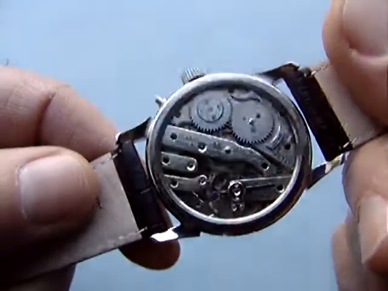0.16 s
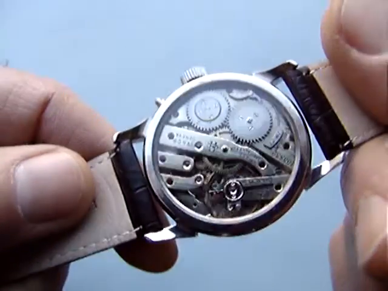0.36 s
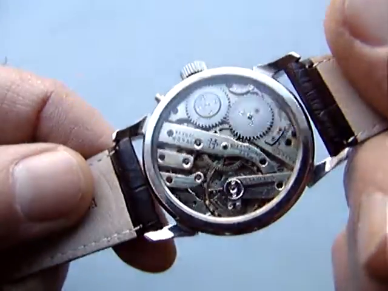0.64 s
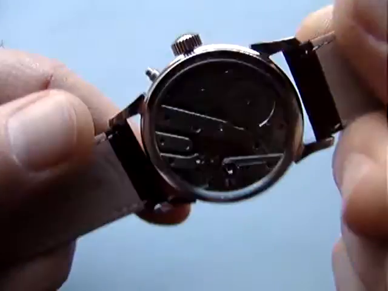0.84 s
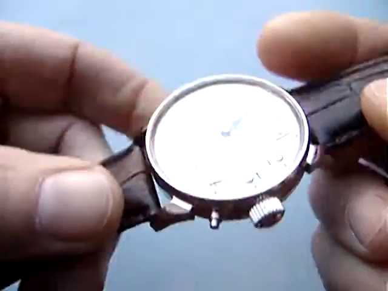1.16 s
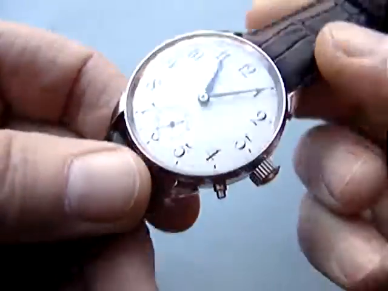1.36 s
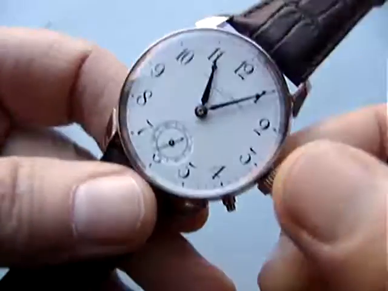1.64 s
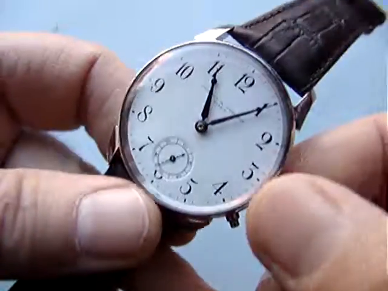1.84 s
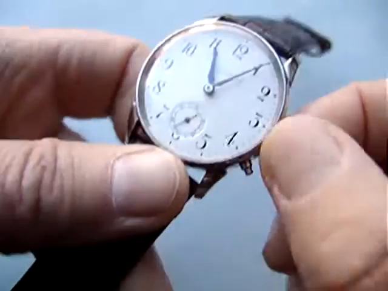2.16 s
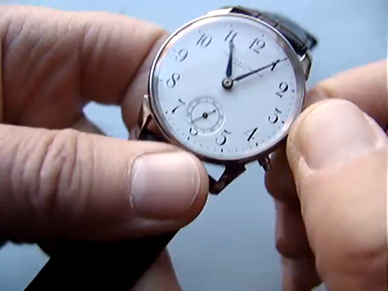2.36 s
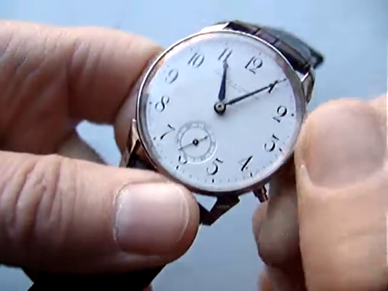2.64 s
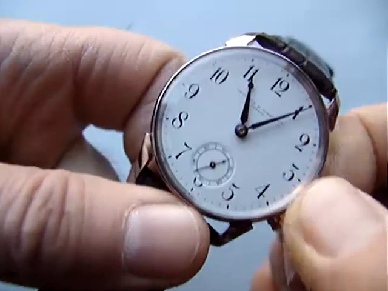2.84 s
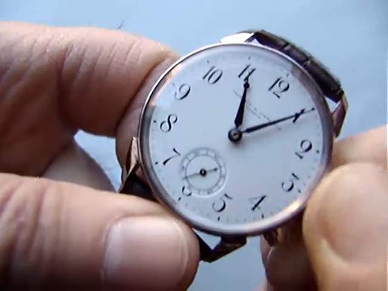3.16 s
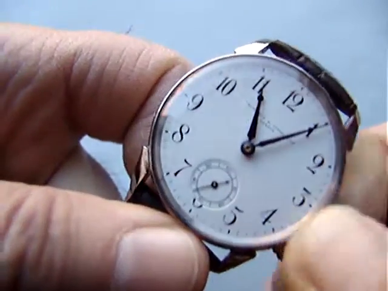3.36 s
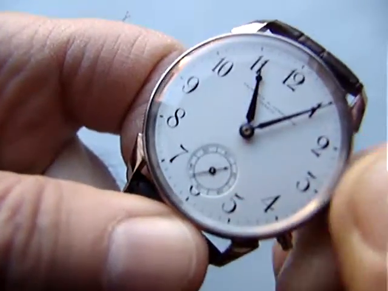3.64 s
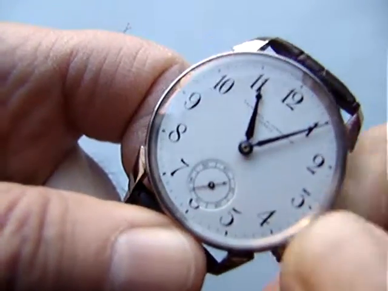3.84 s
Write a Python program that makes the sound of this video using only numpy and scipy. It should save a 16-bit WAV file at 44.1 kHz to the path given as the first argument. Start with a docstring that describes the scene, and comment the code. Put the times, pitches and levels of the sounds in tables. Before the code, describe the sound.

A wristwatch is wound close to the microphone in a quiet room. First, fingers softly rub and tap the case and strap over faint ticking; then short twists of the crown give quick runs of crisp metallic clicks.

```python
"""A quiet room, one microphone close to a mechanical wristwatch held in the hand.
The watch is turned over, then wound in short twists of the crown: the ratchet pawl snaps over the teeth
and rings the movement. Fingertips tap and bump the case, skin rubs on strap and case, and the escapement
ticks faintly. Behind the watch lie the hiss and low rumble of the room."""
import sys
import numpy as np
from scipy import signal
from scipy.fft import rfft, irfft
from scipy.io import wavfile

SR = 44100
rng = np.random.default_rng(int(sys.argv[2]) if len(sys.argv) > 2 else 0)


def put_to_file(sound):
    """Save the sound as 16-bit audio at rate SR, in the file named by the first command-line argument."""
    columns = np.atleast_2d(sound).T  # one column per channel
    safe = np.clip(columns, -1, 1)
    whole_steps = np.round(safe * 32767)
    wavfile.write(sys.argv[1], SR, whole_steps.astype(np.int16))


N = 176400

# pawl snaps: t/s, then level/dB of the upper, case, plate and top rings
PAWL = [(2.3585, -30.5, -56, -38.5, -37), (2.4019, -23, -65, -40, -28), (2.4277, -22.5, -61, -40.5, -25),
        (2.4598, -22.5, -64.5, -47, -25), (2.492, -24.5, -71, -40, -26), (2.5144, -24.5, -65, -40.5, -25),
        (2.5358, -23.5, -81, -40, -27.5), (2.5576, -28, -100, -41, -26), (2.5843, -26.5, -69, -48, -26),
        (2.7307, -68, -63, -34.5, -64), (2.7557, -24, -48, -21.5, -9), (2.779, -30, -44, -31, -15.5),
        (2.8011, -19, -41.5, -22, -14), (2.827, -20.5, -48.5, -24, -24.5), (2.8475, -27, -48, -32.5, -24.5),
        (2.8539, -25, -61, -37, -18), (2.9316, -39, -79, -53, -27.5), (2.9966, -32, -74, -44, -21),
        (3.022, -31, -62, -42, -24), (3.0318, -22.5, -51, -31.5, -17.5), (3.0417, -62, -53, -34, -66),
        (3.0604, -27, -59, -44, -24), (3.0812, -29, -62, -41, -23.5), (3.1102, -32, -63, -44.5, -21),
        (3.2791, -21.5, -54, -30, -12.5), (3.3025, -25.5, -53, -41, -11), (3.3238, -33, -58, -41.5, -14),
        (3.3482, -32, -61, -36, -13), (3.4279, -26.5, -77, -40.5, -27), (3.4645, -17.5, -44.5, -28.5, -19),
        (3.488, -31, -65, -42, -27), (3.5087, -28.5, -59, -46, -28), (3.5301, -26, -58, -50, -25.5),
        (3.5453, -32.5, -52.5, -38, -34), (3.5586, -31.5, -55, -41.5, -23),
        (3.5693, -24.5, -60, -48.5, -31), (3.587, -31, -60, -44, -27.5), (3.6194, -24, -98, -48, -29.5),
        (3.7221, -32.5, -68, -54, -35), (3.7446, -19.5, -59, -43, -31), (3.7595, -18.5, -56, -40.5, -13),
        (3.7744, -24, -56, -39, -18), (3.791, -30, -53.5, -36, -23), (3.8125, -27, -60.5, -38.5, -20.5),
        (3.916, -34.5, -71, -52, -30.5), (3.935, -22, -51.5, -34.5, -46), (3.9498, -31, -62, -40, -30),
        (3.964, -25.5, -52.5, -50, -34), (3.9786, -26.5, -58, -42.5, -31.5), (3.9964, -23, -64, -48, -40)]
# modes of those four rings, one list each: f/Hz, level/dB, t60/s
MOVEMENT = [
    [(4750, -23, 0.015), (5550, -25.5, 0.016), (6140, -8.5, 0.0073), (6466, -6.5, 0.013),
     (7080, -17.5, 0.009), (7480, -9.5, 0.0062)],
    [(1478, 8.5, 0.012), (2300, 19.5, 0.0021)],
    [(3118, -0.5, 0.009), (3503, -3.5, 0.01), (4000, -2.5, 0.0033)],
    [(8220, -17.5, 0.0067), (9030, -16, 0.0097), (9030, -31.5, 0.0062)],
]
# noise band that goes with each ring: low f/Hz, high f/Hz, level/dB
CRACK_BANDS = [(4100, 9300, -6), (1500, 2700, 13), (2600, 3100, -2.5), (7100, 12500, -5)]
# the grip changes between twists and retunes two rings: from t/s, case pitch/ratio, plate pitch/ratio
GRIP = [(2.3, 0.93, 1.06), (2.7, 1.007, 1.03), (2.9, 0.91, 0.97), (3.7, 0.988, 0.857), (3.9, 0.935, 0.95)]
# light rebounds of the pawl after some snaps: t/s, level/dB
REBOUNDS = [(2.436, -33), (2.519, -42), (2.541, -45), (2.764, -37.5), (2.8395, -49), (2.859, -39.5),
            (3.309, -39), (3.436, -28)]
def ratchet():
    """The pawl drops behind a tooth and rings wheels, plate and case; rebounds stir the upper ring."""
    times, *levels = np.transpose(PAWL)
    grip_start, case_pitch, plate_pitch = np.transpose(GRIP)
    twist = np.searchsorted(grip_start, times) - 1
    pitches = (1, case_pitch[twist], plate_pitch[twist], 1)
    blows = times + 0.0013
    scatter = dict(spread_s=0.0004865, detune=0.007, varies_db=1)
    out = np.zeros(N)
    for db, modes, (low_hz, high_hz, crack_db), pitch in zip(levels, MOVEMENT, CRACK_BANDS, pitches):
        out += strike(blows, db[:, None], modes, attack_s=0.00029, pitch=pitch, **scatter)
        out += crack(blows, db + crack_db, low_hz, high_hz)
    rebound_times, rebound_db = np.transpose(REBOUNDS)
    return out + strike(rebound_times, rebound_db[:, None], MOVEMENT[0], attack_s=0.00037, **scatter)


def crack(times, db, low_hz, high_hz):
    """Steel on steel gives a dry burst of band noise; a faint rising noise leads into each burst."""
    lead_in_db, lead_in_rise_s, t60_s = -9, 0.00079, 0.008
    t = np.arange(-300, 700) / SR   # the blow falls at t = 0
    lead_in = amp(lead_in_db) * np.exp(t / lead_in_rise_s)
    envelope = np.where(t < 0, lead_in, amp(-60 * np.abs(t) / t60_s))
    bursts = np.zeros(N + SR)
    for onset, gain in zip(times + t[0], amp(db)):
        start = int(onset * SR)
        bursts[start:start + len(t)] += gain * envelope * rng.standard_normal(len(t))
    return bandpass(bursts[:N] + 1e-18, low_hz, high_hz, order=2)


# fingertip taps, and last a knock of the case that goes with the first pawl snap: t/s, level/dB, brightness/(dB
# per octave), pitch/ratio
TAPS = [(0.8, -40.5, -9, 1.06), (0.876, -39, -1.5, 0.98), (1.079, -55, 12, 0.53), (1.096, -48, 3.5, 0.71),
        (1.415, -46, 12, 0.71), (1.547, -32.5, -8, 0.88), (1.656, -30.5, -3.5, 1.01),
        (1.678, -31.5, -8, 1.28), (1.688, -41, -3.5, 1), (2.011, -27.5, -9, 1.06),
        (2.354, -30.5, -9, 1.064)]
# modes of the tapped case: f/Hz, level/dB, t60/s
CASE_MODES = [(629, -27.5, 0.026), (843, -17, 0.026), (1303, 2.5, 0.0061), (1920, -5, 0.011),
              (2590, 0, 0.006), (3280, 4.5, 0.0041), (3850, -2, 0.0075)]
def taps():
    """Fingertips and nails knock the case; harder contacts ring the upper modes more."""
    times, db, brightness, pitch = np.transpose(TAPS)
    octaves = np.log2(np.transpose(CASE_MODES)[0] / 1200)   # brightness pivots on 1200 Hz
    mode_db = db[:, None] + brightness[:, None] * octaves
    return strike(times, mode_db, CASE_MODES,
                  attack_s=0.00084, spread_s=0.00033, detune=0.015, varies_db=1.5, pitch=pitch)


# bumps of the finger pads: t/s, level/dB, f/Hz
BUMPS = [(2.623, -30.5, 847), (2.975, -37.5, 200), (3.300, -37, 860), (3.315, -42.5, 212)]
# the ring of a bump: pitch/ratio, level/dB, t60/cycles
BUMP_RING = [(1.0, -16.5, 38)]
def bumps():
    """A padded contact starts softly and rings a few dozen cycles."""
    out = np.zeros(N)
    for onset, db, hz in BUMPS:
        modes = [(ratio * hz, ring_db, cycles / hz) for ratio, ring_db, cycles in BUMP_RING]
        out += strike([onset], np.array([[db]]), modes,
                      attack_s=0.5 / hz, spread_s=0.00072, detune=0.006, varies_db=0.49)
    return out


# skin sliding on leather and metal, one list a stroke: t/s, body level/dB, resonance f/Hz, treble level/dB
STROKES = [
    [(-.03, -47, 3320, -48), (.06, -62, 3000, -97), (.12, -58, 3180, -75)],
    [(.74, -60, 2950, -99), (.774, -48.5, 3100, -48.5), (.825, -56.5, 3080, -105), (.872, -60, 2370, -49.5),
     (.9, -53, 2720, -75), (.934, -50.5, 3180, -85), (.954, -44.5, 3530, -92), (.985, -50, 3020, -76)],
    [(.99, -54.5, 2400, -76), (1.04, -52, 2380, -67), (1.095, -47, 2040, -78), (1.14, -48.5, 2280, -40),
     (1.172, -50, 2050, -104), (1.195, -53, 2100, -86), (1.225, -43.5, 2300, -59), (1.26, -49, 2800, -58),
     (1.3, -48.5, 2600, -71)],
    [(1.29, -48, 2830, -77), (1.34, -51, 2500, -55), (1.385, -44.5, 4160, -77), (1.41, -49, 2530, -91),
     (1.5, -61.5, 2540, -50)],
    [(1.52, -61, 2100, -79), (1.6, -53, 2520, -85), (1.63, -57, 2220, -63), (1.68, -51, 1610, -85),
     (1.72, -77, 1780, -65)],
    [(2.0, -58, 2420, -63), (2.09, -59, 2500, -60.5), (2.135, -50.5, 2200, -54), (2.18, -58.5, 2510, -123),
     (2.22, -57, 2260, -53.5), (2.34, -59, 2100, -104)],
    [(2.58, -35, 3000, -82), (2.62, -76, 3160, -76), (2.7, -80, 2910, -95), (2.72, -48.5, 3020, -46.5),
     (2.74, -56, 2940, -69)],
    [(3.225, -86, 3000, -70), (3.25, -49.5, 2840, -47), (3.275, -65, 3050, -79)],
]
# breadth of the resonance in each stroke: width/Hz
STROKE_WIDTHS = [2000, 1900, 1100, 2600, 2400, 3000, 3000, 3000]
def rubbing():
    """Dense friction grains pass a gliding resonance, a broad mid band and a treble band."""
    grains_per_s, grain_spread_db, mid_db, fade_s = 15000, 1.5, 4, 0.025
    contacts = rng.random(N) < grains_per_s / SR
    grains = contacts * rng.standard_normal(N) * amp(grain_spread_db * rng.exponential(1, N))
    mid = rms_one(bandpass(grains, 1300, 6500, order=1))
    treble = rms_one(bandpass(grains, 6000, 12000, order=2))
    out = np.zeros(N)
    for stroke, width_hz in zip(STROKES, STROKE_WIDTHS):
        times, body_db, hz, treble_db = np.transpose(stroke)
        span = np.arange(max(int(times[0] * SR), 0), int(times[-1] * SR))
        t = span / SR
        resonance = gliding_resonance(grains[span], np.interp(t, times, hz), width_hz)
        body = amp(np.interp(t, times, body_db)) * rms_one(resonance + amp(mid_db) * mid[span])
        top = amp(np.interp(t, times, treble_db)) * treble[span]
        fade = np.clip(np.minimum(t - times[0], times[-1] - t) / fade_s, 0, 1)
        out[span] += fade * (body + top)
    return out


# escapement beats, five a second, heard only now and then: t/s, level/dB
BEATS = [(0.0838, -42.5), (0.2798, -44), (0.483, -39), (0.6808, -47), (1.6776, -52), (1.882, -54),
         (2.681, -51), (2.8865, -56), (3.69, -44)]
# modes of a tick: f/Hz, level/dB, t60/s
TICK_MODES = [(8600, 0, 0.0094), (7680, 3, 0.0047)]
def escapement():
    """Each beat, faint even this close, is a weak unlocking contact and then a louder drop."""
    unlock_lead_s, unlock_db = 0.018, -8
    drops, drop_db = np.transpose(BEATS)
    times = np.r_[drops, drops - unlock_lead_s]
    db = np.r_[drop_db, drop_db + unlock_db]
    return strike(times, db[:, None], TICK_MODES,
                  attack_s=0.00081, spread_s=0.0003, detune=0.0046, varies_db=7.6)


# room tone, the spectra of its three noises: f/Hz, relative level/dB
HISS = [(290, -30), (500, -2), (2000, -4), (4000, -8), (6500, -10.5), (8000, -13), (11000, -14)]
RUMBLE = [(25, -12.5), (50, -18), (120, -2), (200, -0.5), (300, 2), (500, -4), (900, -25.5)]
SWELL = [(150, -30), (300, -4), (440, 0), (620, -14), (900, -35)]
# rise and fall of the low-mid swell: t/s, level/dB
SWELL_LEVEL = [(0, -77), (.3, -71), (.55, -61.5), (1.0, -63), (1.5, -75), (1.9, -72), (2.099, -61),
               (2.9, -71.5), (3.6, -80), (3.85, -60.5), (4, -62)]
def room():
    """Behind the watch: steady hiss and rumble, a slowly swelling low-mid band and faint mains hum."""
    hiss_db, rumble_db, hum_db, mains_hz = -59, -63, -82.5, 60
    t = np.arange(N) / SR
    times, swell_db = np.transpose(SWELL_LEVEL)
    steady = amp(hiss_db) * coloured(HISS) + amp(rumble_db) * coloured(RUMBLE)
    swell = amp(np.interp(t, times, swell_db)) * coloured(SWELL)
    hum = amp(hum_db) * np.sqrt(2) * np.sin(2 * np.pi * mains_hz * t)
    return steady + swell + hum


def strike(times, db, modes, attack_s, spread_s, detune, varies_db, pitch=1):
    """Each blow rings the modes a moment apart, varied in strength and tuning; db is blows x modes."""
    damping_curve = 1.9   # above 1 a ring holds at first, then dies away quickly
    hz, mode_db, t60 = np.transpose(modes)[:, None, :, None]
    size = int(t60.max() * SR) + 200
    draws = rng.standard_normal((len(times), 3, len(modes), 1))
    lateness, tuning, strength = np.moveaxis(draws, 1, 0)
    t = np.maximum(np.arange(size) / SR - spread_s * np.abs(lateness), 0)
    envelope = (1 - np.exp(-t / attack_s)) ** 2 * amp(-60 * (t / t60) ** damping_curve)
    hz = hz * np.reshape(pitch, (-1, 1, 1)) * (1 + detune * tuning)
    gain = amp(db[..., None] + mode_db + varies_db * strength)
    rings = gain * envelope * np.sin(2 * np.pi * hz * t)
    out = np.zeros(N + size + SR)
    for onset, ring in zip(times, rings.sum(axis=1)):
        start = int(onset * SR)
        out[start:start + size] += ring
    return out[:N]


def gliding_resonance(x, hz, width_hz):
    """Two resonators in series, retuned every 128 samples; rms 1."""
    radius = np.exp(-np.pi * width_hz / SR)
    out, state = np.zeros(len(x)), np.zeros((2, 2))
    for i in range(0, len(x), 128):
        angle = 2 * np.pi * hz[i] / SR
        resonator = [0.61, 0, -0.52, 1, -2 * radius * np.cos(angle), radius ** 2]
        out[i:i + 128], state = signal.sosfilt([resonator] * 2, x[i:i + 128], zi=state)
    return rms_one(out)


def coloured(spectrum):
    """Steady noise with the given spectrum; rms 1."""
    hz, db = np.transpose(spectrum)
    bin_hz = np.maximum(np.arange(N // 2 + 1) * SR / N, 1)
    gain = amp(np.interp(np.log(bin_hz), np.log(hz), db))
    return rms_one(irfft(rfft(rng.standard_normal(N)) * gain, N))


def bandpass(x, low_hz, high_hz, order):
    return signal.sosfilt(signal.butter(order, [low_hz, high_hz], "band", fs=SR, output="sos"), x)


def amp(db):
    return 10 ** (np.asarray(db) / 20)


def rms_one(x):
    return x / np.sqrt(np.mean(x ** 2) + 1e-20)


def scene():
    """Watch and fingers up close, the room behind, all on one microphone."""
    return (ratchet() + escapement() + taps() + bumps() + rubbing() + room())[None]


def record(dry):
    """The top of the microphone signal is cut steeply."""
    cutoff_hz = 10220
    return signal.sosfilt(signal.cheby2(24, 42, cutoff_hz, fs=SR, output="sos"), dry)


dry = scene()
out = record(dry)
put_to_file(out)
```